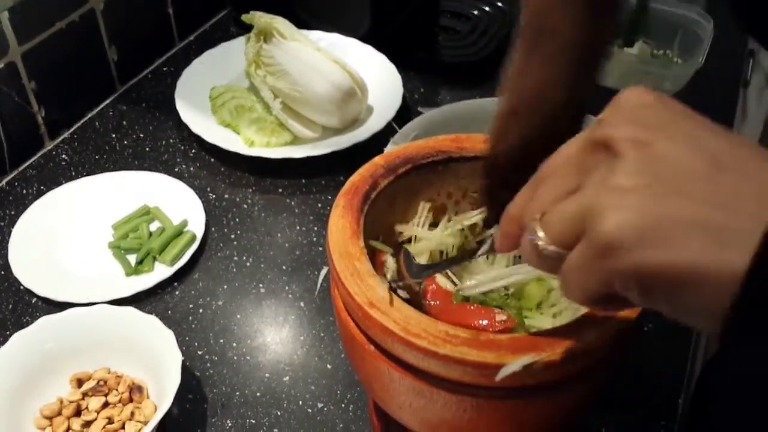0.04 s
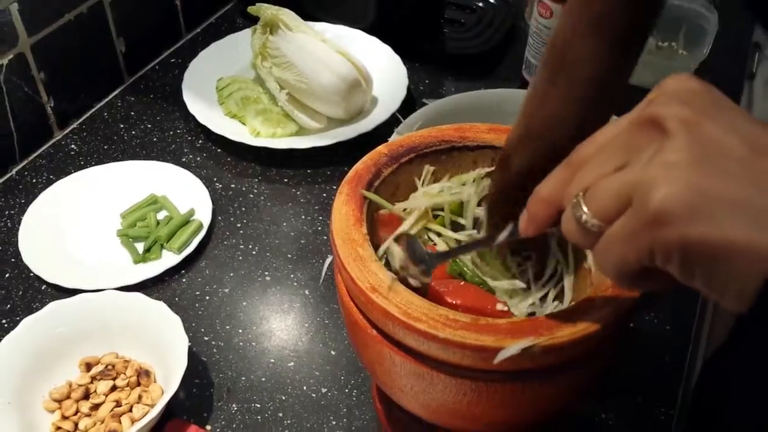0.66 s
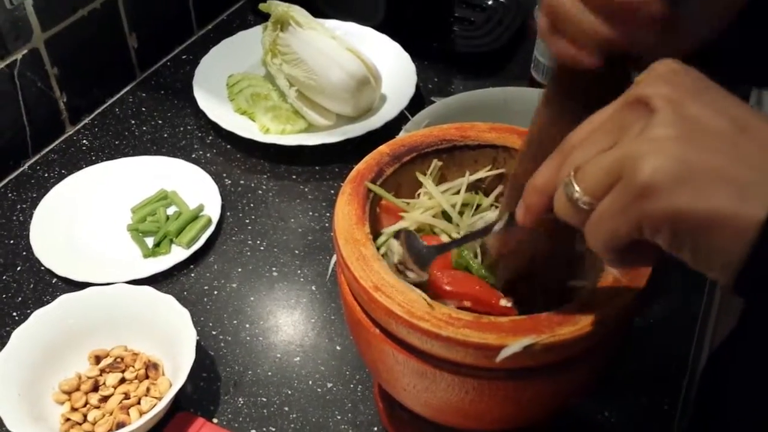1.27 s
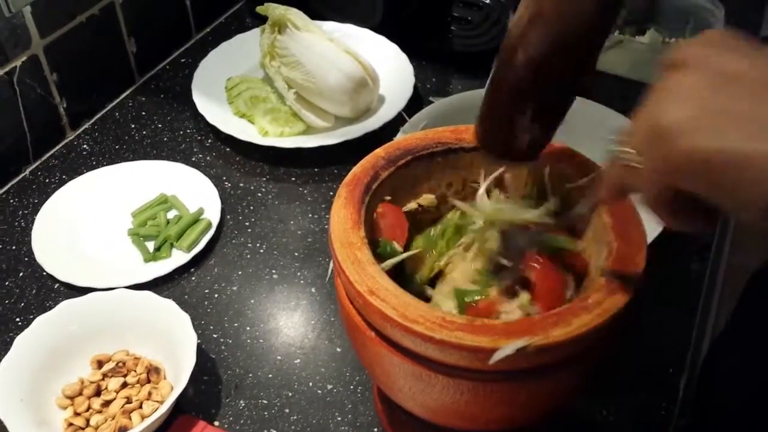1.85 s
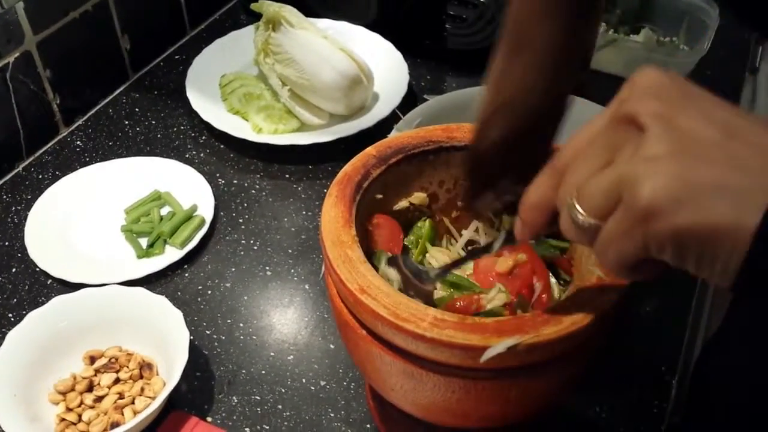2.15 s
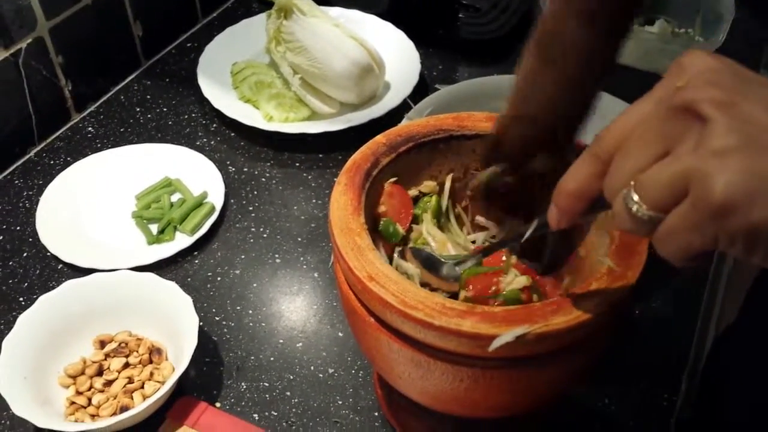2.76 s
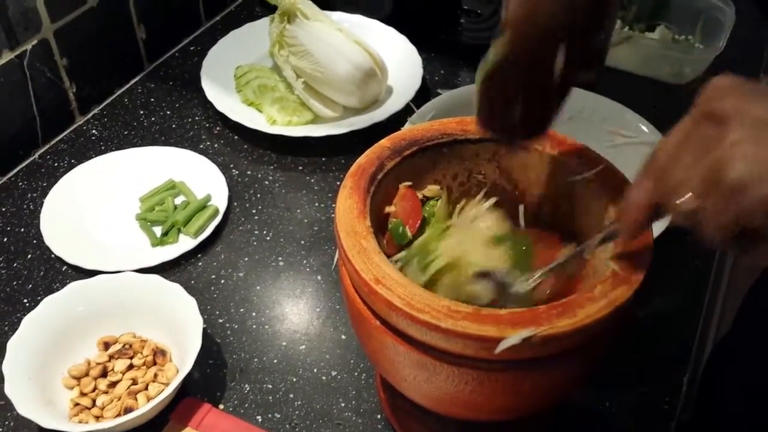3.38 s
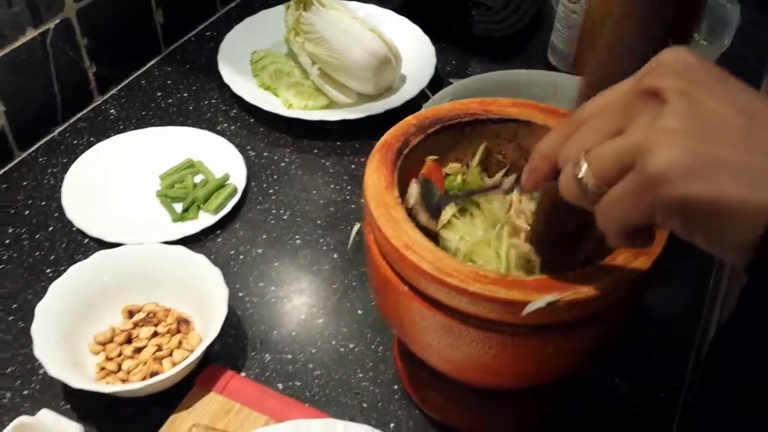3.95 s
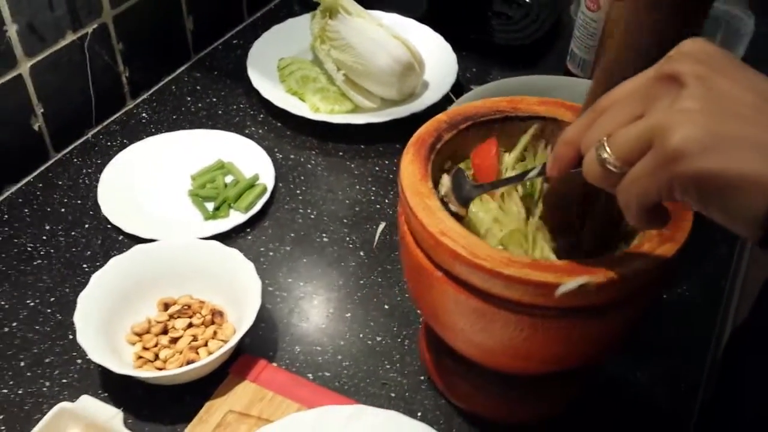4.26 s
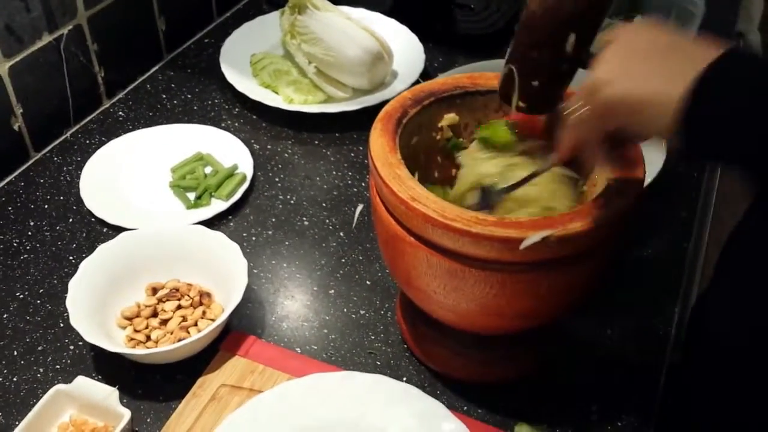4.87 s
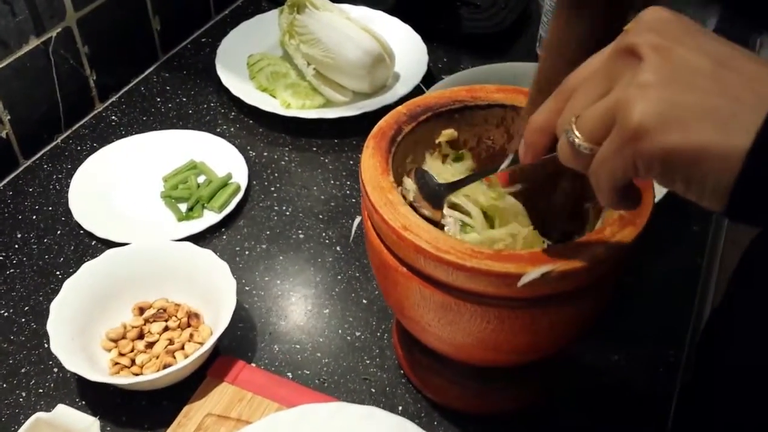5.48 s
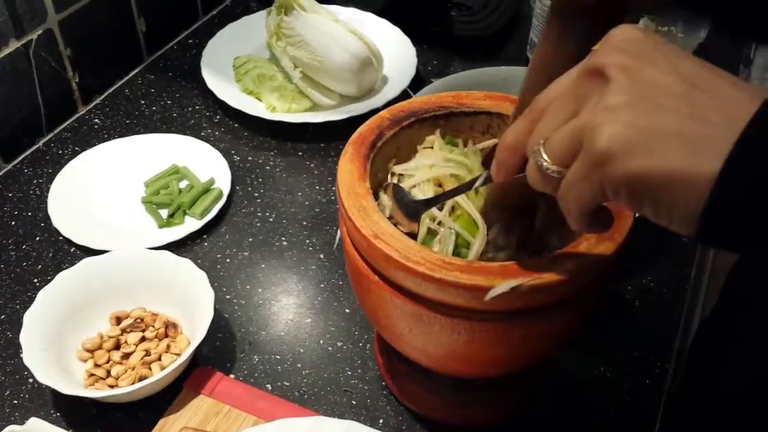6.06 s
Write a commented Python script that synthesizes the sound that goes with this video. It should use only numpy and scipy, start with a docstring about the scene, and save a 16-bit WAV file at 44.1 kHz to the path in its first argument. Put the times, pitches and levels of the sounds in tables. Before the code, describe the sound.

Close, steady pounding of salad in a clay mortar: moist crunches, dull thuds and sharp knocks, with brief spoon scoops in a kitchen.

```python
"""A tiled kitchen: close by, a wooden pestle pounds shredded papaya in a clay mortar on the counter.
Each stroke crushes wet shreds and thumps the counter; where it reaches the clay it knocks and the
bowl rings. Between strokes a spoon turns the salad and taps the bowl.
The tiles add a short bright reverberation over low room noise."""
import sys
import numpy as np
from scipy import signal
from scipy.fft import rfft, irfft, next_fast_len
from scipy.io import wavfile
from scipy.ndimage import uniform_filter1d

SR = 44100
rng = np.random.default_rng(int(sys.argv[2]) if len(sys.argv) > 2 else 0)


def materialize(psi):
    """Save the field psi as 16-bit PCM at rate SR to the path in sys.argv[1].

    A 1-D psi becomes a single channel; in a 2-D psi each row is a channel.
    """
    bounded = np.clip(np.atleast_2d(psi).T, -1, 1)
    quanta = np.round(bounded * 32767).astype(np.int16)
    wavfile.write(sys.argv[1], SR, quanta)


N = 269892
T = np.arange(SR) / SR

# bowl modes, the hollow dying fast, the clay wall ringing on: (frequency [Hz], level [dB], t60 [s])
BOWL_MODES = [(760, -12.5, 0.16), (887.7, 9.5, 0.055), (914, -17.5, 0.53), (1480, -32, 0.19),
              (1830, -9, 0.081), (1880, -10.5, 0.17), (1920, -17.5, 0.21), (2484, 4.5, 0.035),
              (2426, -4.5, 0.093), (2930, -16.5, 0.25), (3156, -5.5, 0.033), (4320, -12.5, 0.064),
              (6200, -35, 0.14)]
SOFT_CORNER_HZ, DAMPED_RING_DB = 670, -16  # contact cushioned by pulp; ring relative to thud


def pestle(squeeze_rise_s=0.0066, release_s=0.0067, steepness=0.76, brush_s=0.0023, slide_db=-41):
    """Each stroke lands with a wet smack, slides through the shreds, squeezes them and thumps the pulp."""
    # (time [s], landing [dB], bare clay [0-1], smack [dB], squeeze delay [s], crunch [dB],
    #  thump delay [s], thump [dB], pulp firmness [0-1])
    strokes = [ (0.000, -44, 0, -32, 0.0057, -28, 0.0018, -25.5, 0.32),
               (0.265, -62, 0.4, -48, 0.0205, -27.5, .016, -24.5, 0.89),
               (0.554, -42, 0.1, -25.5, 0.015, -28, 0.013, -18, 0.96),
               (0.8131, -24.5, 0, -33.5, 0.027, -25, 0.037, -16, 0.28),
               (1.0742, -17, 0.81, -26.5, 0.031, -23.5, 0.05, -35, 0.2),
               (1.3183, -17.5, 0.19, -26, 0.048, -27, 0.055, -23, 0.16),
               (1.564, -17, 0.62, -33, 0.063, -27.5, 0.072, -25.5, 0.34),
               (2.085, -45, 0.2, -30, 0.026, -24.5, 0.035, -19.5, 0.4),
               (2.369, -52, 0.2, -36, 0.025, -23, 0.025, -29, 0),
               (2.665, -62, 0.2, -13, .013, -24.5, .014, -27.5, 1),
               (2.920, -25.5, 0.96, -24, 0.03, -26, .044, -21, 0.28),
               (3.2092, -16.5, 0.8, -23.5, 0.022, -22.5, 0.02, -23, 0),
               (3.759, -61, 0, -50, 0.0425, -27, .046, -48, 0.3),
               (4.075, -58, 0, -26, 0.0305, -22.5, 0.027, -22.5, 0.53),
               (4.3823, -21.5, 0.91, -26, 0.032, -20.5, 0.033, -15, 0.48),
               (4.654, -22, 0.06, -36, 0.0432, -16.5, .012, -24, 0.42),
               (5.187, -28, 0.48, -28.5, 0.022, -27, 0.031, -34, 0.8),
               (5.45, -31.5, 0, -29.5, 0.028, -19, 0.024, -26.5, 0.7),
               (5.763, -22.5, 0.03, -30.5, 0.024, -25.5, 0.04, -23, 0.98),
               (6.026, -18, 0.03, -26.5, 0.051, -22, 0.063, -16, 0.74)]
    out = silence()
    t = T[:8192] - T[2048]  # zero at the landing
    for at_s, land_db, bare, smack_db, squeeze_s, crunch_db, thump_s, thump_db, firm in strokes:
        # only bare clay rings freely
        landing = blow(bare, SOFT_CORNER_HZ * 2 ** (0.89 * bare), DAMPED_RING_DB + 29 * bare)
        thump = blow(firm, SOFT_CORNER_HZ * 2 ** (0.3 * firm), DAMPED_RING_DB)
        from_peak = np.maximum((squeeze_s - t) / squeeze_rise_s, (t - squeeze_s) / release_s)
        squeeze = np.exp(-from_peak ** steepness)
        slide = np.exp(np.minimum(t, 0) / brush_s) * (t < squeeze_s)  # brushes loose shreds first
        pressure = np.maximum(squeeze, undb(slide_db - crunch_db) * slide)
        smack_hz = 7000 * 2 ** (-0.54 * bare)  # drops to a woody crack on clay
        add(out, at_s, undb(land_db) * landing)
        add(out, at_s, tick(smack_db, smack_hz))
        add(out, at_s + t[0], undb(crunch_db) * shreds(pressure, snaps_per_s=3800, squelch_db=-2.5))
        add(out, at_s + thump_s, undb(thump_db) * thump)
    return out


def blow(hardness, knock_corner_hz, ring_db):
    """A blow shakes the counter, knocks the mortar and rings the bowl; harder is shorter and knocks more."""
    # counter modes: (frequency [Hz], level [dB], t60 [s])
    counter_modes = [(81, -13.5, 0.95), (106, -22, 0.41), (131.3, 1, 0.2), (172.3, 0.5, 0.061),
                     (228.3, -8, 0.27), (244, -11, 0.085), (307.4, -6.5, 0.34), (394.6, 4.5, 0.16),
                     (483, -4, 0.34), (710, -12, 0.115)]
    # impact spectra: (frequency [Hz], gain [dB])
    thud_spectrum = [(30, -24.5), (70, -12.5), (130, -2), (200, -2), (380, 0), (550, -14), (1000, -14),
                     (3000, -41)]
    knock_spectrum = [(100, -25), (300, -2), (500, -13.5), (680, -0.5), (1050, -2.5), (1600, -7.5),
                      (2500, -6), (5000, -10.5), (14000, -40)]
    thud_corner_hz = 202 * 2 ** (1.18 * hardness)
    push = contact(burst(thud_spectrum, t60_s=0.08, rattle_db=1.5), thud_corner_hz)
    counter = contact(ring(counter_modes, spread_db=2.5, detune=0.018), thud_corner_hz)
    thud = at_level(push, 0) + at_level(counter, -7)
    thud = at_level(reflect(thud, db=-4), 0)
    thud[2] *= undb(-2)  # room send
    knock = contact(burst(knock_spectrum, t60_s=0.077, rattle_db=4.5), knock_corner_hz)
    bowl = contact(ring(BOWL_MODES, spread_db=3.5, detune=0.0038), corner_hz=800)
    knock = at_level(reflect(knock, db=2.5), -12.5 + 17.5 * hardness)
    bowl = at_level(reflect(bowl, db=-9), ring_db)
    return thud + knock + bowl


def shreds(pressure, snaps_per_s, squelch_db, spread_db=4):
    """Wet fibres break and spit juice in a swarm of clicks whose strength follows the pressure."""
    # fibres and juice in the hollow of the bowl: (frequency [Hz], gain [dB])
    fibre_spectrum = [(500, -31), (1500, -27), (3000, -3.5), (4500, -4), (7800, -1.5), (10500, -8.5),
                      (14500, -21)]
    juice_spectrum = [(150, -17), (500, -4), (1000, 1.5), (1700, 0.5), (2500, 0), (4000, -15.5),
                      (8000, -16)]
    out = 0
    for spectrum, db in ((fibre_spectrum, 0), (juice_spectrum, squelch_db)):
        strength, sign, chance = rng.random((3, len(pressure)))
        sizes = undb(-spread_db * np.log(np.maximum(strength, 1 / 20))) * np.sign(sign - 0.5)
        swarm = sizes * (chance < snaps_per_s / SR) * pressure
        out = out + at_level(reflect(colour(swarm, spectrum), db=6), db)
    return out


def snaps(stir_s=(1.82, 2.08), stir_ticks=14):
    """Thick shreds snap and juice pops; the wet salad ticks faintly as the spoon turns it."""
    # single snaps: (time [s], level [dB], centre [Hz])
    single_snaps = [(0.351, -36.5, 1730), (2.394, -17, 7200), (3.135, -43, 7100), (5.174, -26, 9300),
                    (5.228, -27.5, 6200), (5.495, -19, 8700), (6.063, -18.5, 7000)]
    out = silence()
    for at_s, db, hz in single_snaps:
        add(out, at_s, tick(db, hz))
    for when, pitch, strength in rng.random((stir_ticks, 3)):
        at_s = np.interp(when, (0, 1), stir_s)
        add(out, at_s, tick(db=-54 + 10 * strength, hz=2200 * 5 ** pitch, t60_s=0.0027, width=0.65))
    return out


def tick(db, hz, t60_s=0.018, width=0.56, size=2048):
    """One fibre or film of juice gives way: a tiny noise burst around one pitch."""
    b, a = signal.iirpeak(min(hz, SR / 3), 1 / width, fs=SR)
    pop = signal.lfilter(b, a, rng.standard_normal(size) * fade(t60_s)[:size])
    return at_level(reflect(pop, db=3.5), db, window=66)


def spoon_taps(highpass_hz=1600):
    """A light, hard tap clacks and wakes mostly the higher modes of the clay."""
    # (time [s], ring [dB], clack [dB], contact corner [Hz], t60 of damping by the resting spoon [s])
    taps = [(3.8453, -13.5, -18.5, 7000, 3.4), (5.249, -19, -18, 2470, 0.05)]
    # (frequency [Hz], gain [dB])
    clack_spectrum = [(500, -4.5), (1000, -2), (1400, -10), (2000, 3.5), (3000, 0), (4200, -9),
                      (12000, -13)]
    out = silence()
    highpass = signal.butter(2, highpass_hz, "high", fs=SR, output="sos")
    for at_s, ring_db, clack_db, corner_hz, damping_t60_s in taps:
        wall = ring(BOWL_MODES, spread_db=1.5, detune=0.0043) * fade(damping_t60_s)
        clack = burst(clack_spectrum, t60_s=0.029, rattle_db=18)
        for part, db in ((wall, ring_db), (clack, clack_db)):
            light = signal.sosfilt(highpass, contact(part, corner_hz))
            add(out, at_s, at_level(reflect(light, db=5), db))
    return out


def spoon_scoops():
    """The spoon shoves loose shreds about and bumps the bowl softly."""
    # (time [s], rustle [dB], swell and fade [s], bump [dB])
    scoops = [(1.714, -39, 0.018, -29), (3.437, -40.5, 0.063, -51), (3.62, -49.5, 0.0018, -37.5),
              (4.891, -38.5, 0.075, -32.5), (5.155, -38, 0.09, -47)]
    out = silence()
    t = T[:16384] - T[8192]  # zero at the bump
    for at_s, rustle_db, swell_s, bump_db in scoops:
        pressure = np.exp(-np.abs(t) / swell_s)
        add(out, at_s + t[0], undb(rustle_db) * shreds(pressure, snaps_per_s=1000, squelch_db=-3.5))
        add(out, at_s, undb(bump_db) * blow(0.2, SOFT_CORNER_HZ, DAMPED_RING_DB))
    return out


def reflect(x, db, t60_s=0.039, build_s=0.00012, size=2048):
    """Quick reflections off bowl, hand and tiles; returns left, right and a dry room send."""
    envelope = (fade(t60_s) * (1 - np.exp(-T / build_s)))[:size]
    echoes = undb(db) * rng.standard_normal((2, size)) * envelope / np.linalg.norm(envelope)
    highpass = signal.butter(1, 600, "high", fs=SR, output="sos")  # long waves bend round
    response = np.zeros((3, size))
    response[:2] = signal.sosfilt(highpass, echoes)
    response[:, 0] += 1
    return signal.oaconvolve(x[None], response, axes=1)


def kitchen_reverb(send, build_s=0.0084):
    """The diffuse room: a noisy stereo tail that dies fastest in the top treble."""
    # (frequency [Hz], t60 [s], level [dB], left-right likeness [0-1])
    bands = [(79, 0.49, -1.5, 1), (192, 0.39, 1, 0.91), (530, 0.35, 1, 0.7), (1022, 0.48, -4, 0.2),
             (2100, 0.41, -2, 0), (5000, 0.35, -3, 0.01), (12700, 0.16, -9, 0.4)]
    centres_hz = [band[0] for band in bands]
    hz = np.fft.rfftfreq(SR, 1 / SR)
    swell = 1 - np.exp(-T / build_s)
    response = np.zeros((2, SR))
    for (_, t60_s, db, likeness), share in zip(bands, np.eye(len(bands))):
        mid, side = rng.standard_normal((2, SR))
        noise = np.sqrt((1 + likeness) / 2) * mid + np.sqrt((1 - likeness) / 2) * np.array([side, -side])
        band_power = curve(list(zip(centres_hz, share)), hz)
        band_noise = irfft(rfft(noise) * np.sqrt(band_power))
        decay = fade(t60_s) * swell
        response += undb(db) * band_noise * decay / np.linalg.norm(decay)
    return signal.fftconvolve(send[None], response, axes=1)[:, :N]


def room_noise(mid_db=-50.5):
    """Low steady noise, alike on both sides in the bass."""
    # (frequency [Hz], gain [dB])
    noise_spectrum = [(25, -20), (60, -2.5), (110, 5.5), (300, -1.5), (800, -17), (2000, -22),
                      (7000, -20.5), (14500, -28.5)]
    mid, side = colour(rng.standard_normal((2, N)), noise_spectrum)
    side = colour(side, [(100, -15), (400, -8.5), (1200, -0.5)])
    return undb(mid_db) * (mid + np.array([side, -side])) / mid.std()


def ring(modes, spread_db, detune):
    """Decaying modes; strength and pitch vary with the place of the blow."""
    out = 0
    for k, (hz, db, t60_s) in enumerate(modes):
        level_draw, pitch_draw = rng.standard_normal(2)
        tone = np.sin(2 * np.pi * hz * (1 + detune * pitch_draw) * T)
        out = out + (-1) ** k * undb(db + spread_db * level_draw) * fade(t60_s) * tone
    return out


def burst(spectrum, t60_s, rattle_db, size=8192):
    """One push, then the rattle of crowded, heavily damped modes; padded to 1 s."""
    x = rng.standard_normal(size) * fade(t60_s)[:size]
    x *= undb(rattle_db) / np.linalg.norm(x)
    x[0] += 1
    return np.pad(colour(x, spectrum), (0, SR - size))


def contact(x, corner_hz):
    """A soft contact lengthens the push and removes treble."""
    return signal.sosfilt(signal.butter(2, min(corner_hz, SR / 3), fs=SR, output="sos"), x)


def colour(x, spectrum):
    """Minimum-phase filter through (frequency [Hz], gain [dB]) points."""
    size = next_fast_len(x.shape[-1] + 4096, real=True)
    gain = undb(curve(spectrum, np.fft.rfftfreq(size, 1 / SR)))
    cepstrum = irfft(np.log(gain), size)
    cepstrum[1:size // 2] *= 2
    cepstrum[size // 2 + 1:] = 0
    return irfft(rfft(x, size) * np.exp(rfft(cepstrum)), size)[..., :x.shape[-1]]


def curve(points, hz):
    """Interpolate (frequency [Hz], value) points over log frequency."""
    points_hz, values = np.transpose(points)
    return np.interp(np.log(hz + 1), np.log(points_hz), values)


def at_level(x, db, window=220):
    """Scale so the loudest window of the mid signal has this rms."""
    mid = x if x.ndim == 1 else x[:2].mean(axis=0)
    return x * undb(db) / np.sqrt(uniform_filter1d(mid ** 2, window, mode="constant").max())


def undb(db):
    return 10 ** (np.asarray(db) / 20)


def fade(t60_s):
    return np.exp(-np.log(1000) * T / t60_s)


def silence():
    """Empty track: left, right, room send."""
    return np.zeros((3, N))


def add(track, at_s, x):
    """Mix x in from at_s, trimmed to the track."""
    start = int(at_s * SR)
    x, start = x[:, max(-start, 0):], max(start, 0)
    track[:, start:start + x.shape[1]] += x[:, :max(N - start, 0)]


def scene():
    """Pestle, spoon and salad in the kitchen, in stereo."""
    # the left microphone faces away and loses near treble: (frequency [Hz], gain [dB])
    left_shadow = [(100, -1), (400, .5), (2500, .5), (5200, 0), (7700, -12), (14000, -18)]
    left, right, send = pestle() + spoon_taps() + spoon_scoops() + snaps()
    near = np.array([colour(left, left_shadow), right])
    return near + kitchen_reverb(send) + room_noise()


def record(dry):
    """The recorder rounds the highest peaks and cuts the top treble."""
    ceiling, top_hz = 1.4, 14700
    rounded = ceiling * np.tanh(dry / ceiling)
    return signal.sosfilt(signal.ellip(8, 0.2, 80, top_hz, fs=SR, output="sos"), rounded)


dry = scene()
out = record(dry)
materialize(out)
```